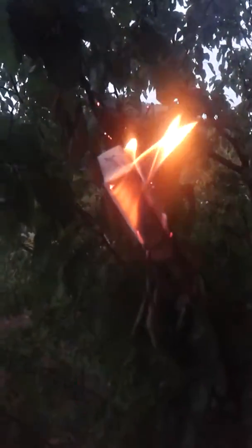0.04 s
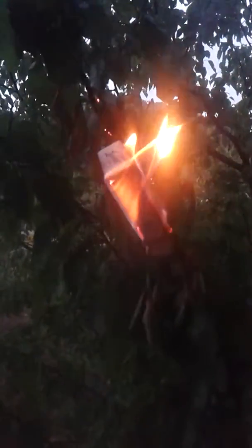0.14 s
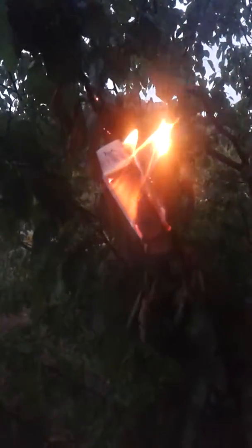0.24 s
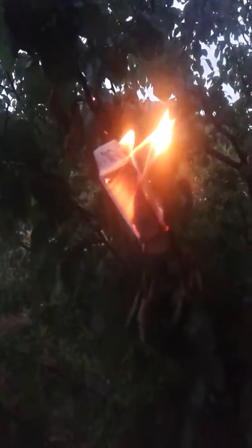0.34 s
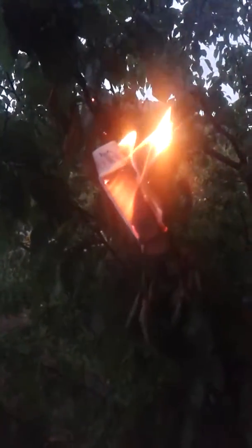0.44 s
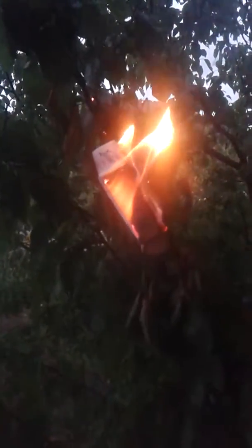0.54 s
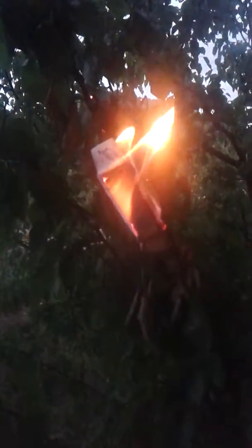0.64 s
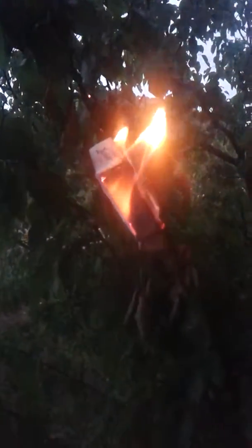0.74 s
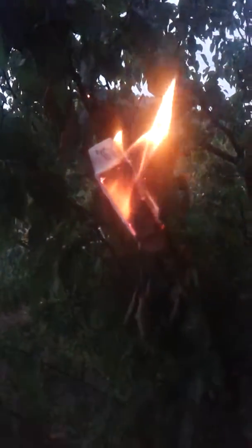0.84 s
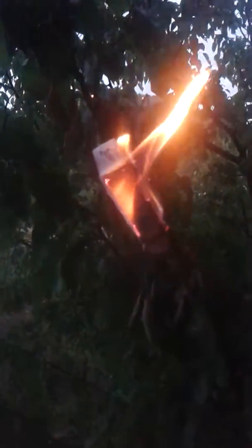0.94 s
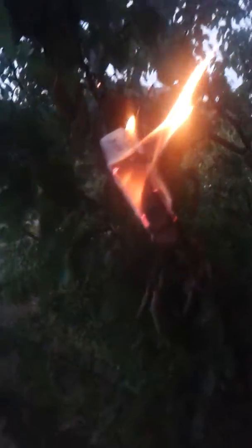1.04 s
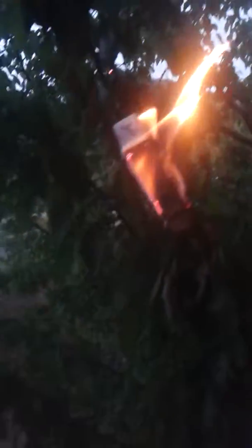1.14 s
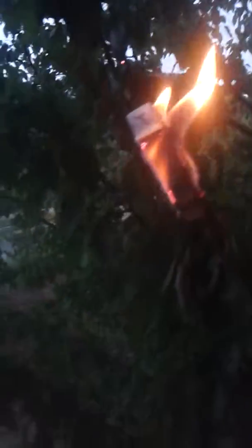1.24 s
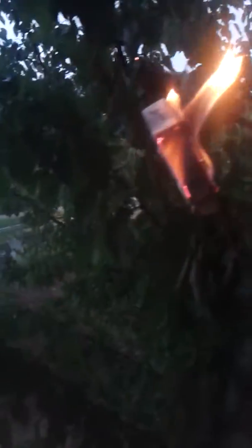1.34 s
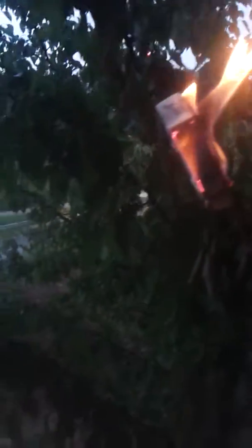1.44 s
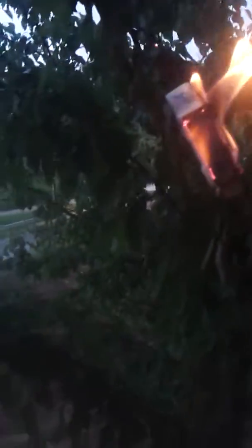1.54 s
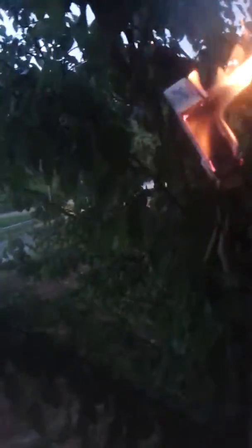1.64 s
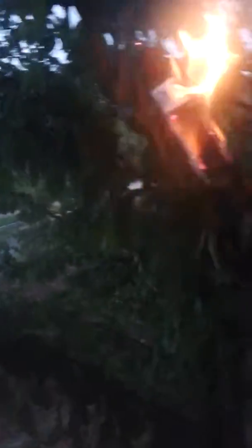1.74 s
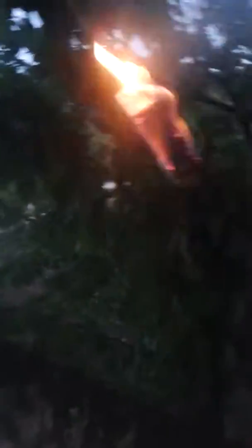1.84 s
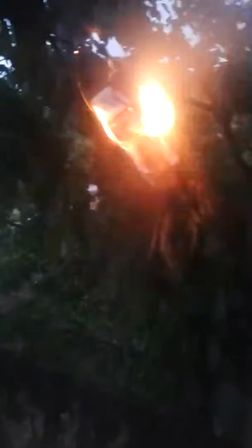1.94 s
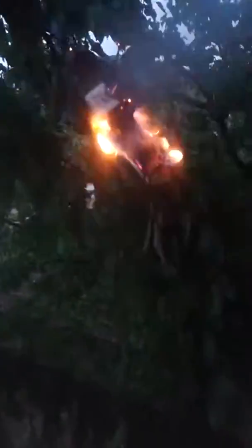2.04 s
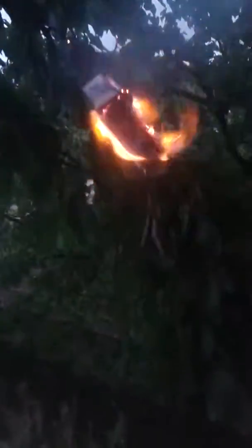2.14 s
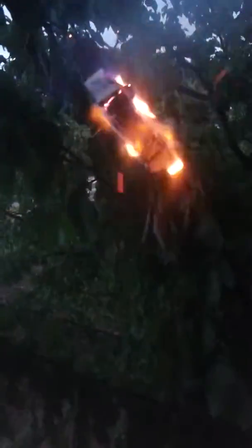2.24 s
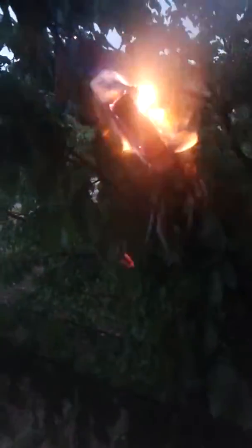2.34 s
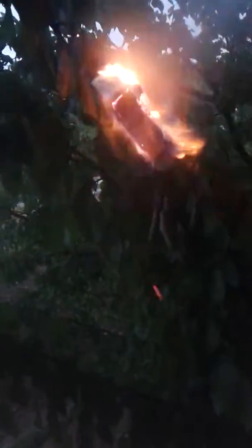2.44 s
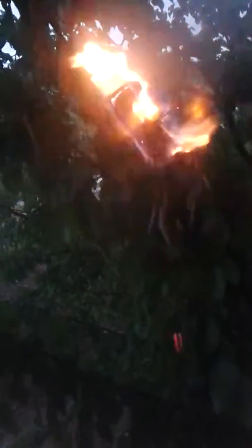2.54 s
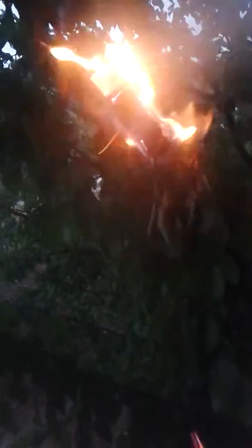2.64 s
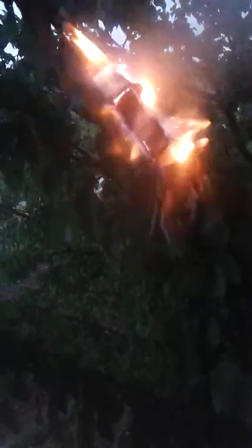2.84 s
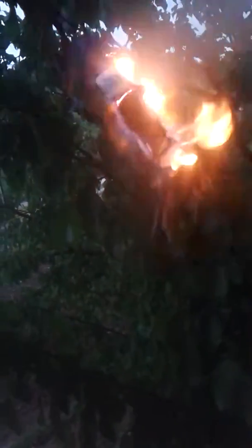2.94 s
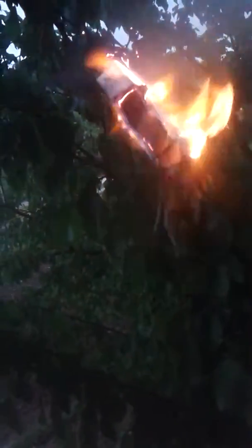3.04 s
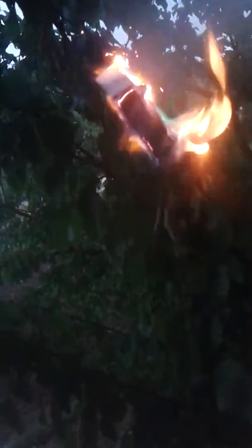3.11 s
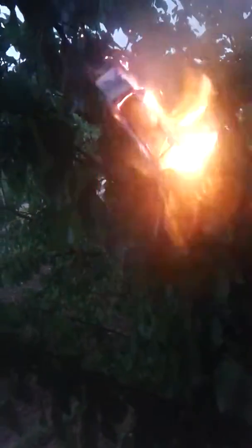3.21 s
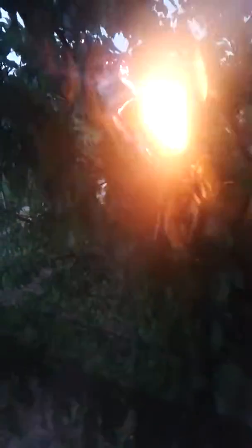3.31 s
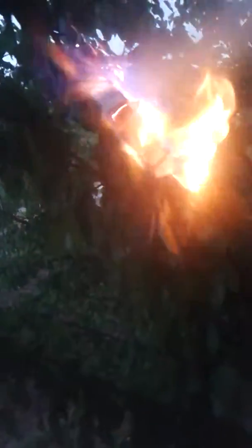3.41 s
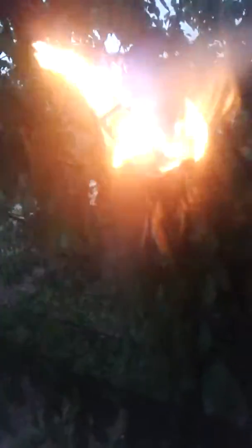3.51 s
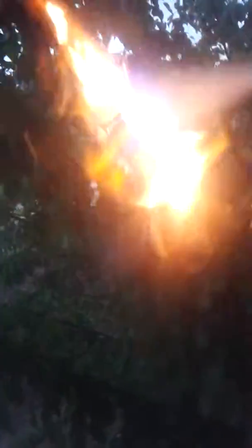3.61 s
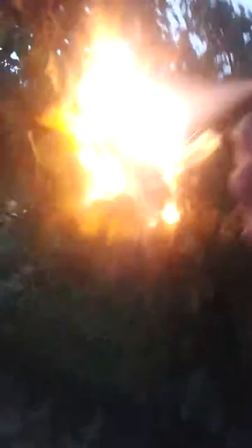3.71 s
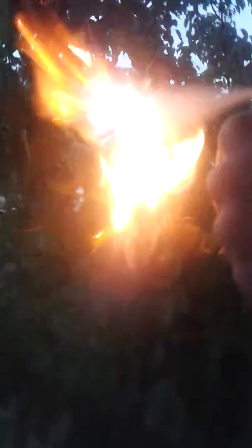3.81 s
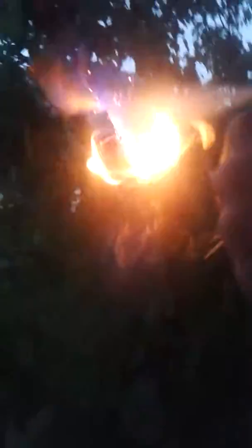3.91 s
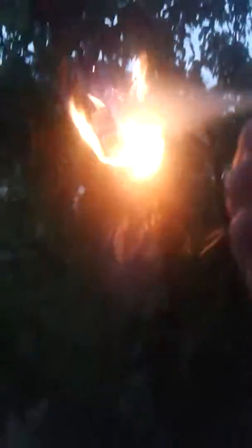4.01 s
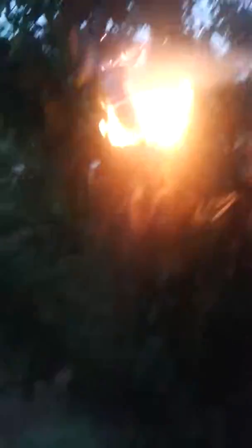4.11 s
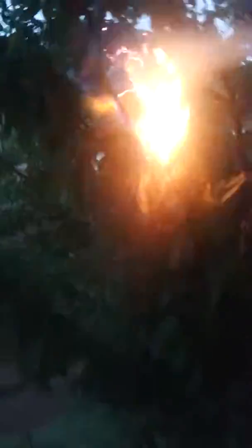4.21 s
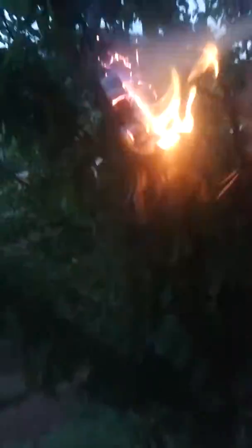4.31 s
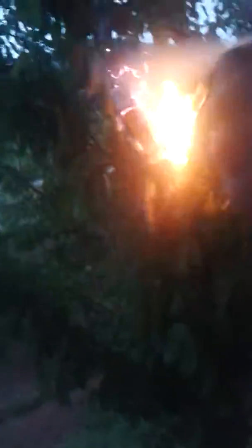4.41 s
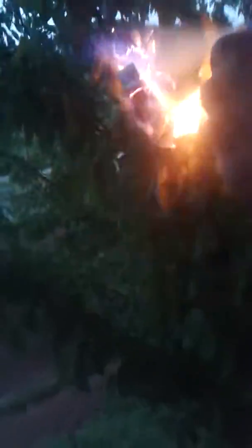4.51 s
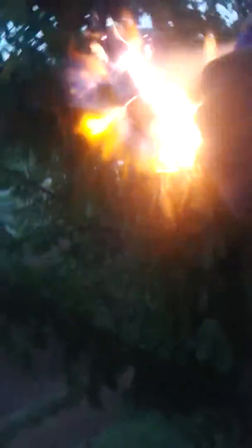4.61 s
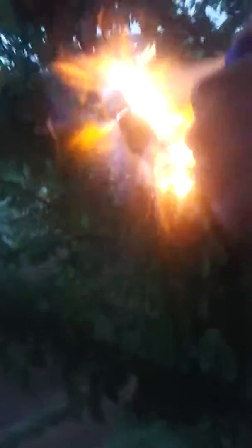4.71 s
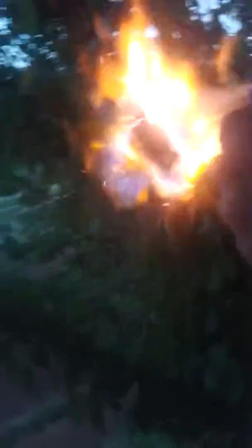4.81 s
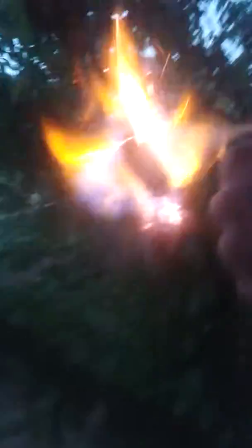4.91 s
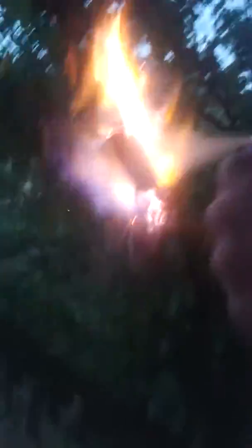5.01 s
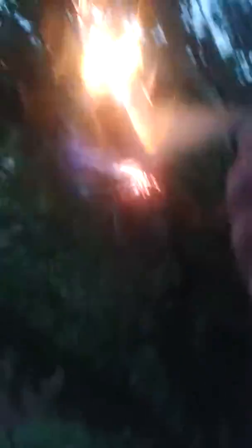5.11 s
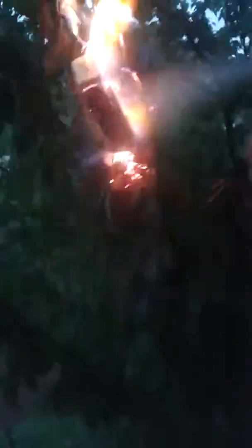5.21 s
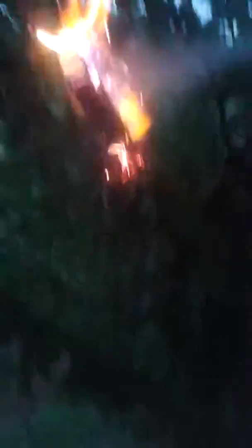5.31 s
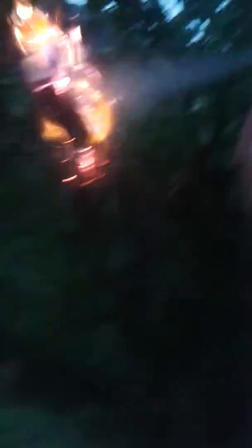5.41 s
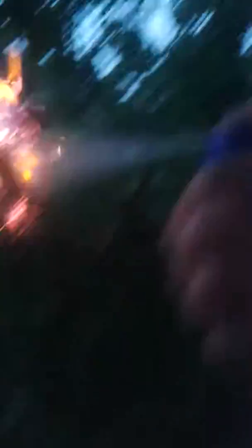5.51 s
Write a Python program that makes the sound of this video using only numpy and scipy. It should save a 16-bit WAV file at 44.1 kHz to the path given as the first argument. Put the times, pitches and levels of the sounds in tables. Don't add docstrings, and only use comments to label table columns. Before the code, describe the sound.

Faint crackle of burning paper outdoors, then a spray can hisses and its gas flares into two booming, fluttering roars with sharp snaps.

```python
import sys
import numpy as np
from scipy import signal
from scipy.fft import rfft, irfft
from scipy.io import wavfile
from scipy.ndimage import uniform_filter1d

SR = 44100
rng = np.random.default_rng(int(sys.argv[2]) if len(sys.argv) > 2 else 0)


def gain_from_db(level_db):
    decades = np.asarray(level_db, float) / 20
    return 10 ** decades


def output_pcm(signal):
    pcm = np.clip(np.atleast_2d(signal).T, -1, 1) * 32767
    wavfile.write(sys.argv[1], SR, np.round(pcm).astype(np.int16))


N = 244755

# time in seconds, low roar level in dB.
BLAZE = [(1.62, -67.5), (1.95, -57.5), (2.26, -47.5), (2.63, -47), (2.96, -42.5), (3.31, -49), (3.43, -34),
         (3.58, -34), (3.67, -23), (3.85, -22.5), (3.97, -33.5), (4.01, -41.5), (4.38, -46), (4.59, -33.5),
         (4.78, -25.5), (4.97, -25.5), (5.2, -37), (5.55, -38)]


def evened(x):
    return x / np.sqrt(np.mean(x ** 2) + 1e-20)


def add(mix, start_s, sound):
    part = mix[round(start_s * SR):][:len(sound)]
    part += sound[:len(part)]


def curves(rows, quiet_db):
    row_s, level_db, *rest = np.transpose(rows)
    t = np.arange(N) / SR
    level = np.interp(t, row_s, level_db, left=quiet_db)
    return [level] + [np.interp(t, row_s, column) for column in rest]


def drift(low_hz, high_hz):
    hz = np.fft.rfftfreq(N, 1 / SR)
    shape = hz / (hz + low_hz) / (1 + (hz / high_hz) ** 2)
    return evened(irfft(rfft(rng.standard_normal(N)) * shape, N))


def coloured(x, points, lo_hz, hi_hz):
    hz = np.fft.rfftfreq(N, 1 / SR)
    point_hz, point_db = np.transpose(points)
    z = rfft(x) * gain_from_db(np.interp(np.log(hz + 1), np.log(point_hz), point_db))
    band = irfft(z * (hz > lo_hz) * (hz < hi_hz), N)
    return irfft(z, N) / np.std(band)


def patchy(depth_db):
    real, imag, patches = rng.standard_normal((N // 128 + 5, 257, 3)).T
    patches = uniform_filter1d(patches, size=6, axis=0)
    patches = evened(uniform_filter1d(patches, size=16, axis=1))
    z = (real + 1j * imag) * gain_from_db(depth_db * patches)
    return signal.istft(z, nperseg=512, noverlap=384)[1][:N]


def echoed(x, paths, stretch, dull_hz):
    n = np.arange(N)
    dull = signal.lfilter(*signal.butter(1, min(dull_hz, 20000), fs=SR), x)
    return x + sum(share * np.interp(n - delay_s * stretch * SR, n, dull) for delay_s, share in paths)


def all_puffs():
    # start in seconds, peak in dB, thump in Hz, tearing in dB over the peak.
    strong = [(1.975, -36.5, 258, -13), (2.08, -31.5, 158, -7), (2.42, -25, 121, -19),
              (2.557, -25, 89, -4.5), (2.705, -28.5, 155, -3.5), (2.781, -21.5, 160, -14.5),
              (2.925, -25.5, 86, -7), (3.084, -25, 157, -27), (3.218, -28, 162, -2.5),
              (3.374, -24.5, 93, -6), (3.63, -5, 112, -14.5), (3.703, -5.5, 115, -14.5),
              (3.731, -5.5, 140, -26), (3.769, -5, 130, -35), (3.833, -12, 113, -30),
              (3.878, -12, 151, -30), (3.977, -15.5, 133, -10.5), (4.179, -19, 96, -23),
              (4.239, -22, 165, -25), (4.495, -18, 103, -14), (4.581, -12.5, 103, -14.5),
              (4.689, -16.5, 83, -7.5), (4.751, -9.5, 100, -22), (4.79, -7, 120, -17),
              (4.873, -4.5, 109, -19.5), (5.036, -16, 157, -18), (5.13, -21, 73, -12),
              (5.245, -28, 138, -20), (5.348, -29, 102, -3), (5.385, -17, 164, -15)]
    licks_per_s = 16
    slot_s = np.arange(BLAZE[0][0], 5.5, 1 / licks_per_s)
    when, size, pitch, tear = rng.random((len(slot_s), 4)).T
    start_s = slot_s + when / licks_per_s
    peak_db = np.interp(start_s, *np.transpose(BLAZE)) + 8 + 3.5 * (2 * size - 1)
    thump_hz = 133.3 * 2 ** (pitch - .5)
    tear_db = -9.5 + 6.3 * (2 * tear - 1)
    return strong + list(zip(start_s, peak_db, thump_hz, tear_db))


def flame():
    # frequency in Hz, level in dB.
    low_spectrum = [(20, -65), (45, -9.5), (100, 0), (200, -3), (350, -14.5), (600, -20), (1200, -31),
                    (3000, -77)]
    mid_spectrum = [(150, -4.5), (300, -3.5), (500, -3), (900, -6), (1450, -8.5), (1800, -16), (3000, -16),
                    (8000, -33)]
    rush_spectrum = [(900, -14), (1800, 1), (3000, 6.5), (5000, -1.5), (7500, -3), (15000, -48)]
    # delay in seconds, share (0-1).
    ground = [
        (0.001977, 0.45),
        (0.00012, 0.022),
        (0.00613, 0.3),
    ]
    # time in seconds, delay factor.
    approach = [(1.7, 1.14), (3.3, 1.12), (3.7, 1.033), (4.4, 0.924), (5.55, 0.97)]

    low_db, = curves(BLAZE, -83.5)
    over_db = low_db + 35
    mid_db = -47 + 0.72 * over_db
    rush_db = -50.5 + 0.27 * over_db
    low_power, mid_power, thumps = gain_from_db(2 * low_db), gain_from_db(2 * mid_db), np.zeros(N)

    rise_s = 0.006
    t = np.arange(0, 8 * rise_s, 1 / SR)
    shape = t / rise_s * np.exp(1 - t / rise_s)
    for start_s, peak_db, thump_hz, tear_db in all_puffs():
        add(low_power, start_s, (gain_from_db(peak_db - 13.5) * shape) ** 2)
        add(mid_power, start_s, (gain_from_db(peak_db + tear_db - 12.0) * shape) ** 2)
        push = shape ** 1.18 * np.sin(2 * np.pi * thump_hz * t)
        add(thumps, start_s, gain_from_db(peak_db - 11.0) * push)
    mid_power = uniform_filter1d(mid_power, size=1000)

    flutter = drift(14, 43)
    low_gain = evened(gain_from_db(1.3 * flutter))
    mid_gain = evened(gain_from_db(1.6 * flutter + 0.65 * drift(40, 160)))
    rush_gain = evened(gain_from_db(.8 * flutter + .8 * drift(40, 200)))
    low = coloured(patchy(0.7) * low_gain, low_spectrum, 50, 500)
    mid = coloured(patchy(3.3) * mid_gain, mid_spectrum, 690, 2700)
    rush = coloured(patchy(1.8) * rush_gain, rush_spectrum, 2200, 4500)

    path = np.interp(np.arange(N) / SR, *np.transpose(approach))
    rush_db = rush_db - .5 * np.maximum(-27 - low_db, 0) + 47 * (1 - path)
    blaze = np.sqrt(low_power) * low + np.sqrt(mid_power) * mid + gain_from_db(rush_db) * rush + thumps
    return echoed(blaze, ground, path, 670)


def shaded(x):
    # time in seconds, frequency in Hz, depth (0-1), length in seconds.
    shade = [
        (3.43, 9100, .65, .04),
        (4.42, 9000, .35, .05),
        (4.9, 9300, .05, .15),
        (5.3, 7900, .3, .06),
        (5.43, 9400, .45, .07),
    ]
    width_hz = 1100
    t, pole = np.arange(N) / SR, np.exp(-np.pi * width_hz / SR)
    for centre_s, hz, depth, length_s in shade:
        turn = np.exp(2j * np.pi * hz * t)
        band = 2 * (turn * signal.lfilter([1 - pole], [1, -pole], x / turn)).real
        x = x - min(depth, 1) * np.exp(-((t - centre_s) / length_s) ** 2) * band
    return x


def spray():
    # time in seconds, jet in dB, top hiss in dB over the jet.
    valve = [(1.38, -88, -4), (1.59, -59, -8), (1.61, -53.5, -3), (1.65, -51.5, -1), (1.75, -51, -4.5),
             (2.05, -48.5, -2), (2.27, -48.5, -1), (3.17, -48.5, -1.5), (3.5, -50, 4), (3.56, -50, 1),
             (3.86, -52.5, 1), (4.02, -51, 0), (4.5, -53.5, .5), (4.72, -52, 1.5), (5.22, -50, 1.5),
             (5.34, -48.5, 4.5), (5.42, -48.5, -8), (5.55, -46.5, -3.5)]
    # frequency in Hz, level in dB.
    body_spectrum = [(200, -25), (500, -2), (1000, -5.5), (1950, -3.5), (2600, -5.5), (4000, -0.5),
                     (5300, 0), (6000, 2), (7000, -2), (8500, -6), (11000, -19)]
    top_spectrum = [(6500, -16), (8500, -5), (10200, 2), (11500, 0), (13000, 3.5), (15000, 2.5)]
    # delay in seconds, share (signed).
    hand = [(.00172, 0.013), (.00238, -0.072), (.00246, .19), (.0028, 0.07)]

    jet_db, aim_db = curves(valve, -100)
    body = coloured(patchy(0.4), body_spectrum, 4260, 7180)
    top = coloured(patchy(1.2), top_spectrum, 10000, 14000)
    jet = shaded(gain_from_db(jet_db) * (body + gain_from_db(aim_db) * top))
    sway = 1 + 0.0076 * drift(.1, 0.31)
    return echoed(gain_from_db(0.94 * drift(3.3, 41)) * jet, hand, sway, 20000)


def fibre_bursts(rows, rasp):
    out = np.zeros(N)
    t = np.arange(3000) / SR
    splinters = rng.standard_normal((len(rows), len(t)))
    for (start_s, peak_db, hz, t60_s, pull_share), noise in zip(rows, splinters):
        bandpass = signal.butter(1, [hz / 1.6, hz * 1.7], "bandpass", fs=SR)
        spread = evened(signal.lfilter(*bandpass, noise))
        ring = (np.sin(2 * np.pi * hz * t) + rasp * spread) * gain_from_db(-60 * t / max(t60_s, .001))
        pull = np.sin(2 * np.pi * np.minimum(hz * t, .5)) ** 2
        add(out, start_s, -gain_from_db(peak_db) * (ring + pull_share * pull))
    return out


def snaps():
    # start in seconds, peak in dB, ring in Hz, t60 in seconds, share of the one-sided pull.
    rows = [(4.8584, -26, 2500, 0.0043, .3), (4.9993, -20, 3650, 0.0016, .4),
            (5.1221, -23.5, 3320, 0.0041, .1), (5.1896, -18.5, 2080, 0.0044, 0.81),
            (5.2020, -32, 3500, 0.0031, 0.27), (5.3077, -21, 4030, 0.0075, 0.54),
            (5.3149, -26, 3880, 0.006, .1), (5.4339, -27, 4250, 0.0034, 0.22),
            (5.4700, -21.5, 4600, 0.0036, 0.24), (5.4873, -32.5, 1110, 0.0027, 3.5)]
    return fibre_bursts(rows, 0.17)


def ticks():
    # start in seconds, peak in dB, ring in Hz, t60 in seconds, share of the one-sided pull.
    rows = [(.079, -60, 3000, 0.012, .5), (.269, -63, 4000, .02, .2), (.397, -54, 2980, .025, .3),
            (.493, -52, 1120, .03, .4), (.68, -53, 1500, 0.022, 0.26), (.905, -59.5, 2950, .06, .1),
            (.959, -52, 4200, 0.0072, .6), (1.052, -53, 2200, .01, .5), (1.122, -54, 402, 0.03, 0.46),
            (1.15, -57, 1470, 0.059, .1), (1.197, -52.5, 452, 0.072, .2), (1.423, -54.5, 486, 0.06, .1),
            (1.456, -52, 1500, 0.022, .4)]
    return fibre_bursts(rows, 0.55)


def calm():
    # time in seconds, level in dB.
    level = [(0.0, -66.5), (0.288, -66.5), (1.044, -64), (1.4, -65)]
    # frequency in Hz, level in dB.
    air_spectrum = [(20, -22), (45, -14), (80, 2.5), (230, -3.5), (550, -1), (1160, -1), (2700, -7),
                    (4600, -10), (14500, -20.5)]
    level_db, = curves(level, -66)
    grain_size = gain_from_db(3.5 * np.minimum(rng.exponential(1, N), 4))
    struck = rng.random(N) < 400 / SR
    grains = grain_size * struck * rng.choice([-1, 1], N)
    drive = evened(patchy(0.61)) + 0.29 * evened(grains)
    return gain_from_db(level_db - 0.5 + 0.57 * drift(2.4, 30)) * coloured(drive, air_spectrum, 640, 3500)


def scene():
    return (flame() + spray() + snaps() + ticks() + calm())[None]


def thinned(x):
    from_hz, to_hz, margin_db, slope = 7300, 14000, -4.3, 0.13
    hz, _, z = signal.stft(x, SR, "cosine", nperseg=2048, noverlap=1024)
    power = abs(z) ** 2 + 1e-20
    band = np.repeat(power[:1024].reshape(128, 8, -1).mean(1), 8, axis=0)
    band = uniform_filter1d(np.vstack([band, band[-1:]]), size=2, axis=1)
    around = uniform_filter1d(band, size=141, axis=0)
    loud_db = 10 * np.log10(power.sum(0)) + 45
    spared_db = 1.2 * np.clip((hz - from_hz) / (to_hz - from_hz), 0, 2)[:, None] ** 2
    limit_db = margin_db + slope * np.clip(loud_db, 0, 25) - spared_db
    weak = band < around * gain_from_db(2 * limit_db)
    gain = np.where(weak & (hz > from_hz)[:, None], .06, 1.)
    return signal.istft(z * gain, SR, "cosine", nperseg=2048, noverlap=1024)[1][:N]


def roll_off(x):
    return signal.sosfilt(signal.butter(12, 14790, fs=SR, output="sos"), x)


def record(dry):
    bass_cut = signal.butter(3, 36, "highpass", fs=SR, output="sos")
    thin = thinned(signal.sosfilt(bass_cut, dry[0]))
    band_limit = signal.firwin(2401, 14540, window=("kaiser", 9), fs=SR)
    mix = signal.oaconvolve(thin, band_limit, "same")[None]
    return roll_off(mix)


dry = scene()
out = record(dry)
output_pcm(out)
```